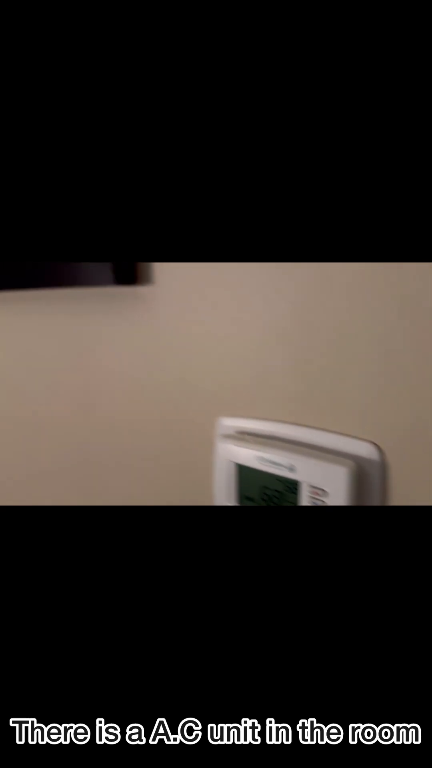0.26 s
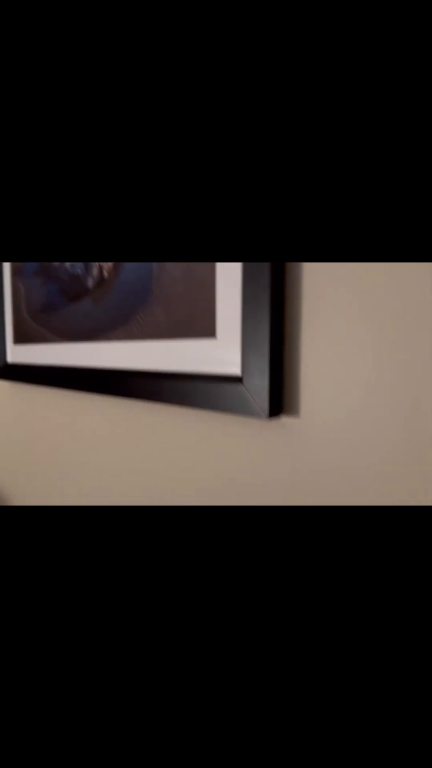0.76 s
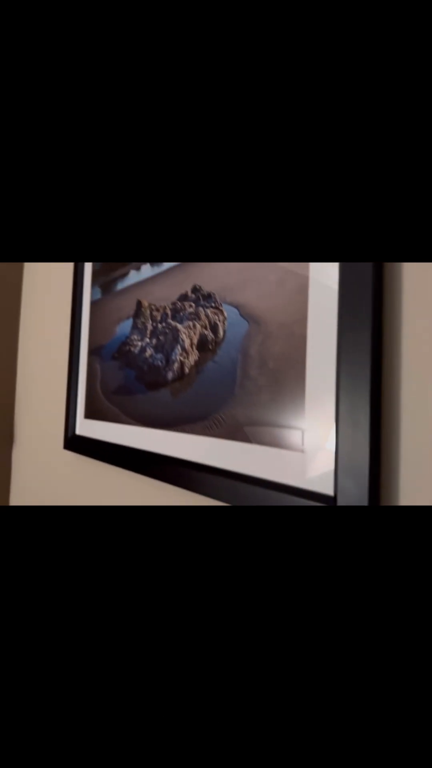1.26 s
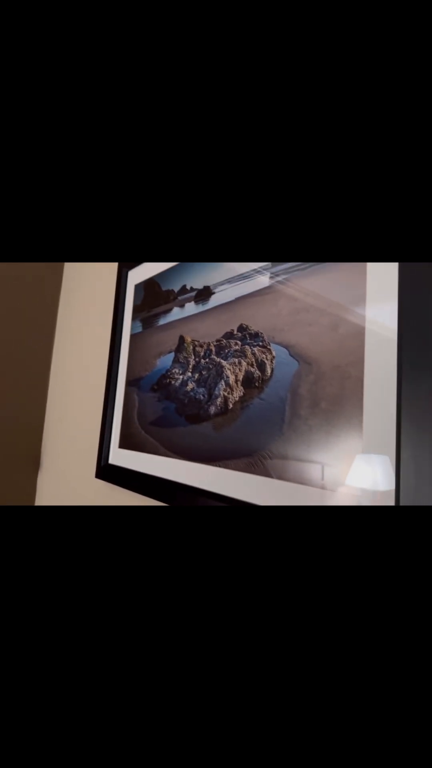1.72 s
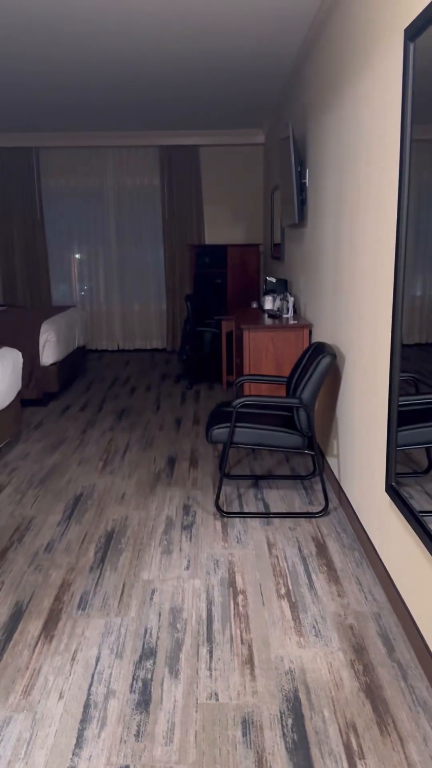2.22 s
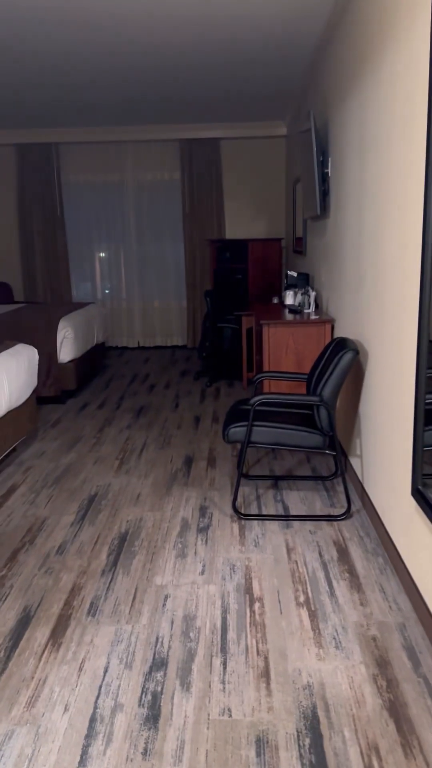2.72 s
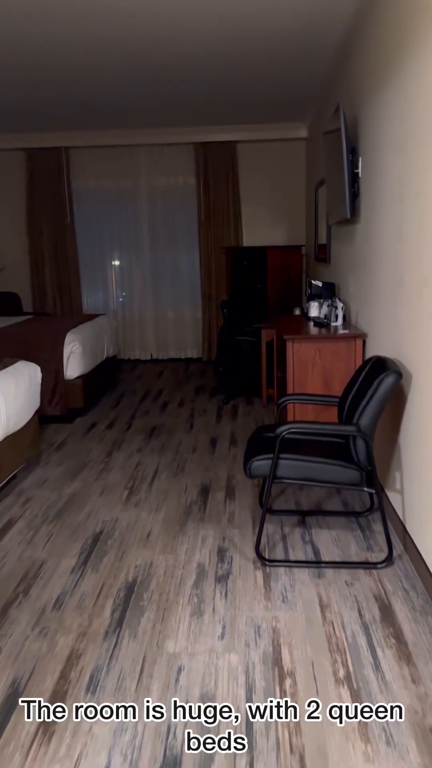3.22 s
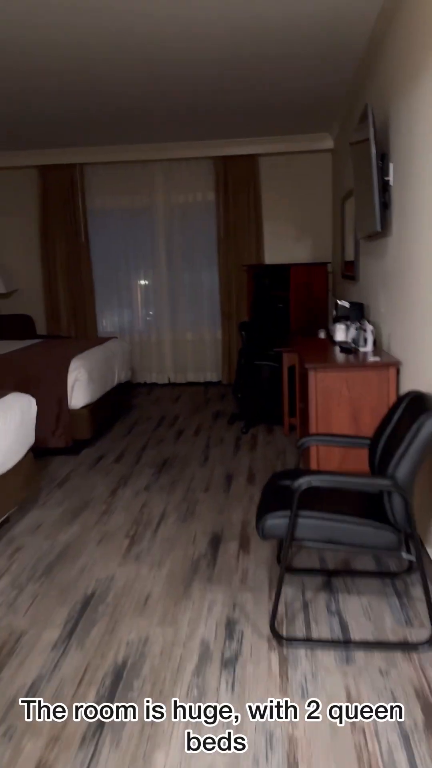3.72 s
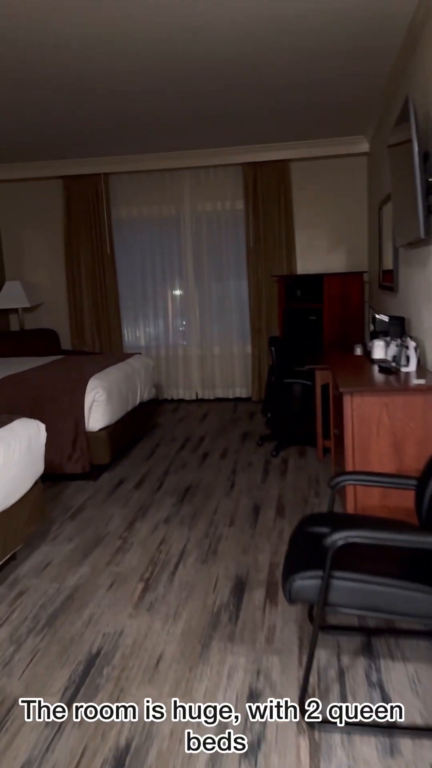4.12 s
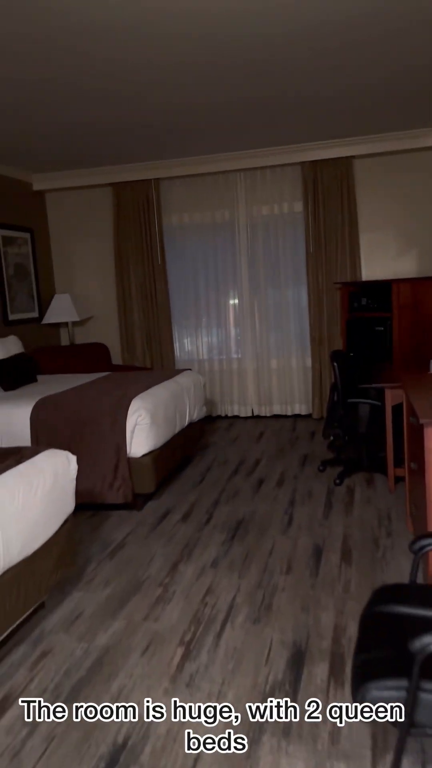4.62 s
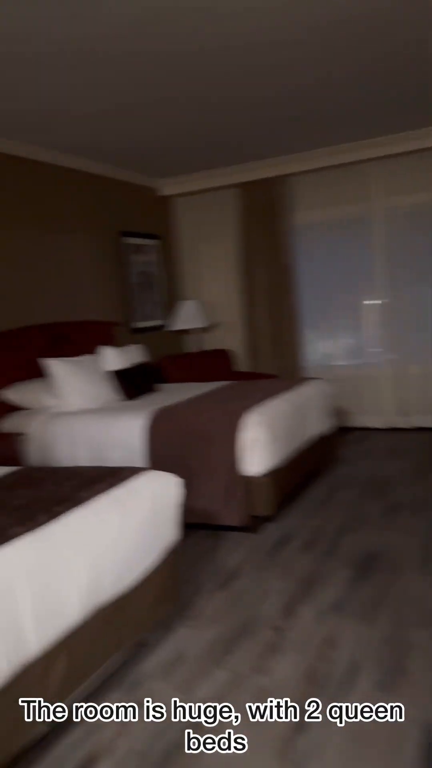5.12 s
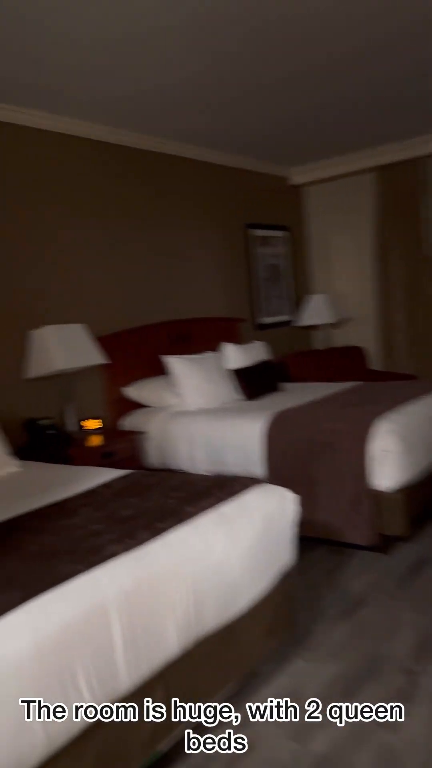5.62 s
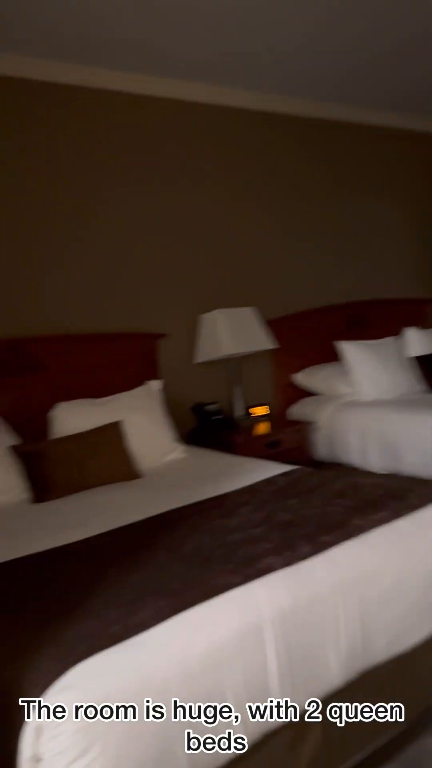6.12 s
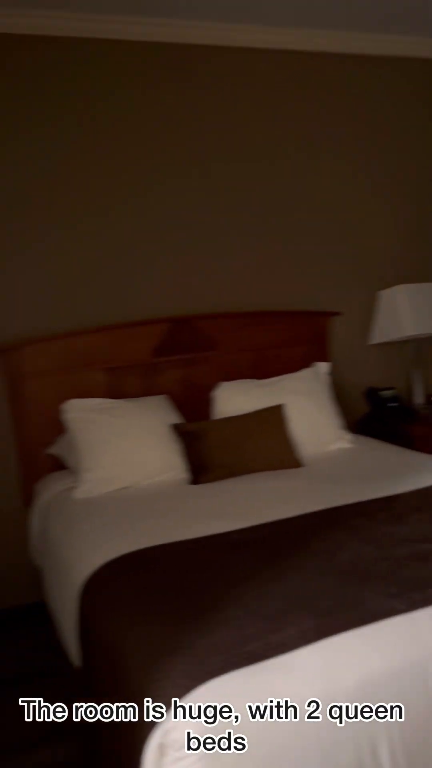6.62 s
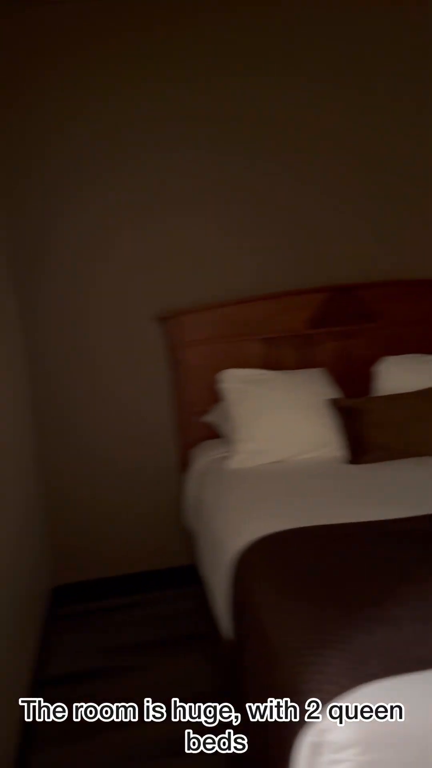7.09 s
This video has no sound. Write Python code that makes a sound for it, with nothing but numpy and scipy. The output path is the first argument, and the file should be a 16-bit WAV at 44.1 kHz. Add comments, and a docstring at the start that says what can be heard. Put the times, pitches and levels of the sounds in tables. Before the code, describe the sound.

A very low, steady air-conditioner drone dominates a furnished bedroom, with a fast gentle throb and soft airy rush. At the start, a knock, cloth rustle and ticks come close by; dull bumps follow near two seconds, a tiny sharp snap near four, and taps, squeaks and a thump around seven. Handheld stereo phone, carried slowly through the room.

```python
"""An air conditioner's compressor drones in a furnished bedroom, as steady rotor and mains tones that beat into a throb.
Its fan adds weak tones at multiples of a third of the rotor speed, with one low hum beside them; shaped noise makes
the air rush and duct resonances. A handheld phone with two microphones is carried through the room's standing waves,
so levels drawn over time rise and sink. Close by, noise strokes make clothes rustle, bursts with decaying tails make
ticks, knocks and squeaks, low modes make bumps, and a falling sweep snaps on the phone's shell."""
import sys
import numpy as np
from scipy import signal
from scipy.fft import rfft, irfft, next_fast_len
from scipy.io import wavfile
from scipy.ndimage import uniform_filter1d, map_coordinates

SR = 44100
rng = np.random.default_rng(int(sys.argv[2]) if len(sys.argv) > 2 else 0)


def put_to_file(sound):
    """Save the sound as 16-bit audio at rate SR, in the file named by the first command-line argument."""
    columns = np.atleast_2d(sound).T  # one column per channel
    safe = np.clip(columns, -1, 1)
    whole_steps = np.round(safe * 32767)
    wavfile.write(sys.argv[1], SR, whole_steps.astype(np.int16))


N = 324249
T = np.arange(N) / SR
ROTOR_HZ, MAINS_HZ = 57.05, 59.975


def amp(db):
    """Gain of a level in dB."""
    return 10 ** (np.asarray(db) / 20)


def unit(x):
    """Scaled to rms 1."""
    return x / np.sqrt(np.mean(x ** 2) + 1e-20)


def along(points, hz):
    """Value at hz between (frequency [Hz], value) points on a log axis."""
    f, v = np.transpose(points)
    return np.interp(np.log(hz + 1), np.log(f + 1), v)


def curves(rows):
    """One value per sample for each column after the time."""
    s, *columns = np.transpose(rows)
    return [np.interp(T, s, column) for column in columns]


def wobble(rate):
    """A smooth random curve with rate knots a second."""
    coarse = T[::128]
    knots = rng.standard_normal(int(N * rate / SR) + 4)
    return np.interp(T, coarse, map_coordinates(knots, [coarse * rate]))


def filtered(x, response):
    """x shaped by a response of frequency."""
    n = x.shape[-1]
    m = next_fast_len(n + 8192)
    return irfft(rfft(x, m) * response(np.fft.rfftfreq(m, 1 / SR)), m)[..., :n]


def coloured(points):
    """White noise shaped by (frequency [Hz], level [dB]) points, rms 1."""
    return unit(filtered(rng.standard_normal(N), lambda f: amp(along(points, f))))


def resonance(centre_hz, width_hz):
    """Response of one damped mode."""
    return lambda f: 1j * f * width_hz / (centre_hz ** 2 - f * f + 1j * f * width_hz)


def tone(hz, db, start_s=None):
    """A tone of rms level db, steady or a curve, cresting at start_s or at a random moment."""
    s = rng.uniform() if start_s is None else start_s
    return np.sqrt(2) * amp(db) * np.cos(2 * np.pi * hz * (T - s))


# How much of the microphones' difference is sound reaching the left one first:
# (frequency [Hz], signed share [-1 to 1])
LEFT_FIRST = [(450, 0.067), (1000, 0.57), (3000, 0.21), (4700, 0.7), (5600, -0.9), (10000, -0.79)]


def noise(mid_points, side_points, patchy_db, ripple_db):
    """Sum and difference noise, each rms 1, with patches of gain and the slow narrow ripple of room resonances."""
    x = rng.standard_normal((2, N))
    # gain depth, window [samples], smoothing over bins and over frames
    for depth_db, window, bins, frames in [(patchy_db, 512, 6, 10), (ripple_db, 4096, 2, 8)]:
        z = signal.stft(x, nperseg=window)[2]
        field = rng.standard_normal(z.shape[1:])
        field = uniform_filter1d(uniform_filter1d(field, bins, 0), frames, 1)
        x = signal.istft(z * amp(depth_db * unit(field)), nperseg=window)[1][:, :N]

    def apart(f):
        # a time lag between the microphones puts the difference a quarter cycle from the sum
        lead = np.clip(along(LEFT_FIRST, f), -1, 1)
        return amp(along(side_points, f)) * np.array([1j * lead, np.sqrt(1 - lead ** 2)])

    mid = filtered(x[0], lambda f: amp(along(mid_points, f)))
    side = filtered(x, apart).sum(axis=0)
    return np.array([unit(mid), unit(side)])


# Air rush in the room, before scaling to rms 1: (frequency [Hz], relative level [dB per Hz])
RUSH_ALIKE = [(170, -33.5), (290, -5), (575, -8), (620, -8), (740, -8), (1030, -22), (1400, -19.5),
              (1750, -27.5), (2400, -19), (2950, -32), (3700, -36), (4450, -30), (5000, -41),
              (10200, -46.5), (10500, -71.5)]  # heard alike at both microphones
RUSH_OPPOSITE = [(76, -31), (130, -7.5), (179, -15), (257, -10.5), (340, -15.5), (584, -6.5), (1250, -22.5),
                 (1800, -39), (2450, -26), (3600, -41.5), (4800, -32), (6000, -50.5), (7500, -41),
                 (15000, -46.5), (15700, -57)]  # heard in opposite phase
RUSH_DB, RUSH_WIDE_DB = -63, -67.5  # usual levels, alike and in opposite phase


def rush():
    """Broad turbulent noise through the grille, its level straying slightly."""
    gain = amp(0.17 * wobble(6.2) + [[RUSH_DB], [RUSH_WIDE_DB]])
    return gain * noise(RUSH_ALIKE, RUSH_OPPOSITE, patchy_db=1.33, ripple_db=2.5)


# Low air noise before scaling to rms 1: (frequency [Hz], relative level [dB per Hz])
RUMBLE_SPECTRUM = [(15, -27.5), (30, -5.5), (70, 0), (100, -6.5), (140, -10.5), (165, -3.5), (185, -16),
                   (215, -8.5), (243, -11.5), (280, -10.5), (305, -19), (330, -69.5)]
# Levels where the phone is, also used by the ducts and the whine: (time [s], duct resonance [dB],
# lower resonance [dB], rumble [dB], rumble's upper part over it [dB], whine sidebands [dB])
PHONE_PLACE = [(0.35, -62, -74, -57, -0.5, -97.5), (1.3, -60, -72, -52.5, -1, -95.5),
               (1.9, -61, -65.5, -49, -4, -95), (2.4, -58.5, -71, -47, -2, -94),
               (2.7, -57, -73, -55, 0, -103.5), (3.2, -57, -65, -55, 1, -103.5),
               (3.9, -52.5, -58.5, -55, 2, -103.5), (4.45, -56.5, -64, -53.5, 1, -103),
               (5.0, -57.5, -60, -53.5, -0.5, -103), (5.95, -61.5, -74.5, -57.5, 2, -96.5),
               (6.6, -61.5, -73, -52.5, -0.5, -95.5), (7.3, -60, -71, -54.5, 0, -102)]


def rumble():
    """Low shaped noise whose part above about 185 Hz rises and sinks separately."""
    _, _, rumble_db, upper_db, _ = curves(PHONE_PLACE)
    body = coloured(RUMBLE_SPECTRUM)
    upper = filtered(body, lambda f: 1 / (1 + (185 / (f + 1)) ** 8))
    body = body + (amp(upper_db) - 1) * upper
    return amp(rumble_db + 1.2 * wobble(2.8)) * body


DUCT, LOW_DUCT = (261, 11), (211.5, 7)  # (centre [Hz], width of each of two cascaded modes [Hz])
WAVER_HZ, WHISTLE_DB = 4, 4.5  # typical pitch straying; usual whistle level over the breathy part
DUCT_WIDE_DB = -17  # opposite-phase part of both resonances


def breath(mode):
    """Noise through the same damped mode twice, rms 1."""
    return unit(filtered(rng.standard_normal(N), lambda f: resonance(*mode)(f) ** 2))


def ducts():
    """Air excites two breathy resonances; the higher one also whistles with a wavering pitch."""
    duct_db, low_db, *_ = curves(PHONE_PLACE)
    whistle = np.cos(2 * np.pi * np.cumsum(DUCT[0] + WAVER_HZ * wobble(5)) / SR)
    duct = unit(breath(DUCT) + amp(WHISTLE_DB + 1.9 * wobble(4.4)) * unit(whistle))
    low, low_apart = breath(LOW_DUCT), breath(LOW_DUCT)
    mid = amp(duct_db) * duct + amp(low_db) * low
    quarter_cycle = filtered(duct, lambda f: 1j + 0 * f)
    side = amp(duct_db) * quarter_cycle + amp(low_db) * low_apart
    return np.array([mid, amp(DUCT_WIDE_DB) * side])


CARRIER_HZ = 9600


def whine():
    """A high carrier, chopped by the rotor: only its two sidebands sound."""
    db = curves(PHONE_PLACE)[4]
    return tone(CARRIER_HZ - ROTOR_HZ, db) + tone(CARRIER_HZ + ROTOR_HZ, db)


# Cloth noise, alike and in opposite phase, before scaling to rms 1:
# (frequency [Hz], relative level [dB per Hz])
CLOTH_ALIKE = [(410, -31.5), (800, -13.5), (1250, -4), (1700, -10.5), (2200, -8), (2700, -13.5),
               (3200, -17.5), (3900, -15.5), (4900, -24.5), (6600, -21), (10200, -35), (10500, -55.5),
               (13600, -54), (14400, -40.5)]
CLOTH_OPPOSITE = [(410, -28), (1020, -10.5), (1630, -31.5), (2530, -15.5), (3600, -21.5), (4800, -22),
                  (6000, -29.5), (9880, -22.5), (15600, -29)]
# Clothes rubbing close by, one row a stroke: (loudest time [s], rise [s], fall [s],
# nominal middle-band peak [dB], treble lift [dB], low lift [dB])
CLOTH_STROKES = [(0.01, .1, 0.14, -62, 8, 6.5), (0.2, 0.06, .12, -60, 0.5, -6),
                 (0.44, 0.18, 0.1, -68, 3, -0.5), (1.58, 0.19, 0.11, -66.5, -8, -2),
                 (1.8, 0.17, 0.2, -66, -0.5, -2), (2.048, .15, .2, -75, 6, 0),
                 (2.35, 0.25, .3, -69.5, 2, -2), (2.69, .3, 0.16, -66, -4.5, -8.5),
                 (4.081, 0.26, 0.19, -69, -3, -2.5), (6.051, 0.24, 0.28, -82.5, 6.5, 0),
                 (7.101, 0.083, .1, -76.5, 1, -1), (7.35, 0.12, .1, -73.5, 4.5, 6)]
STROKE_EDGE_DB = 10.5  # how far a stroke is down a rise before and a fall after its peak
CLOTH_WIDE_DB = -6.5  # opposite-phase part


def rustle():
    """Cloth slides over cloth in strokes that swell and fade, each with its own balance of low, middle and treble."""
    gain = amp(0.86 * wobble(25) + [[0], [CLOTH_WIDE_DB]])
    cloth = gain * noise(CLOTH_ALIKE, CLOTH_OPPOSITE, patchy_db=2.0, ripple_db=3.0)
    low, dull = (filtered(cloth, lambda f: 1 / (1 + (f / edge_hz) ** 4)) for edge_hz in (1650, 4200))
    power = np.zeros((3, N))
    for s, rise, fall, db, bright_db, low_db in CLOTH_STROKES:
        stroke_db = db - STROKE_EDGE_DB * ((T - s) / np.where(T < s, rise, fall)) ** 2
        power += amp(stroke_db) ** 2 * amp([[low_db], [0], [bright_db]]) ** 2
    bands = [low, dull - low, cloth - dull]
    return (np.sqrt(power)[:, None] * bands).sum(axis=0)


# Opposite-phase part of ticks, knocks and squeaks: (frequency [Hz], level [dB])
TOUCH_OPPOSITE = [(400, -8.5), (2000, -7.5), (4500, -4.5), (9000, 2), (13000, 8)]
TOUCH_ALIKE = [(10000, 0.5), (10500, -15.0), (13500, -13), (14500, -2.5)]  # (frequency [Hz], level [dB])
CRACK_S = 0.00065  # a crack is one impulse with the energy of this much tail, at 0 dB


def bursts(rows):
    """Each burst is an optional crack and a decaying noise tail, ringing in one band at both microphones."""
    out, t = np.zeros((2, N + SR)), T[:SR // 2]
    for s, db, centre_hz, width_hz, t60, crack_db, rise, hold in rows:
        shape = amp(-60 * np.maximum(t - hold, 0) / t60) * (1 - np.exp(-t / rise))
        near, far = shape * rng.standard_normal((2, len(t)))
        near[0], far[0] = amp(crack_db) * np.sqrt(CRACK_S * SR) * rng.choice([-1, 1], size=2)
        apart = 0.67 * far + filtered(near, lambda f: 1j * along(LEFT_FIRST, f))

        def response(f):
            # narrow bands are raised to offset the noise they reject
            band = resonance(centre_hz, width_hz)(f) ** 2 * np.sqrt(SR / width_hz)
            return band * amp([along(TOUCH_ALIKE, f), along(TOUCH_OPPOSITE, f)])

        out[:, round(s * SR):][:, :len(t)] += amp(db) * filtered(np.array([near, apart]), response)
    return out[:, :N]


STRIKE_RISE_S = 0.0012  # time constant of the tail's onset in ticks and knocks

# Small ticks and taps of floor and grip, a row for each band that rings: (time [s], nominal level [dB],
# centre [Hz], mode width [Hz], t60 [s], crack over the tail [dB])
TICK_BANDS = [(0.1582, -62, 6170, 5000, .4, 4.5), (0.176, -61, 3700, 1180, 0.22, -4.5),
              (0.2, -60.5, 700, 498, 0.38, -3), (0.331, -69, 3800, 1300, .35, 9.5),
              (0.334, -75.5, 6600, 2000, .25, 3), (0.42, -73, 6400, 2994, 0.31, 3),
              (0.333, -72, 1900, 1200, .3, 0), (0.42, -71, 1900, 1200, .35, 1),
              (0.4188, -67, 3800, 1200, 0.25, 8), (1.108, -79, 9060, 4040, .3, 3),
              (1.4558, -76.5, 4420, 2200, 0.24, 13), (1.4902, -71, 7870, 993, 0.36, 2),
              (1.4922, -78, 13400, 2970, .26, 2), (1.524, -76.5, 4030, 798, .12, 16.5),
              (1.523, -68.5, 2220, 896, 0.16, 2), (1.523, -77.5, 6470, 2990, .2, 11.5),
              (1.7531, -76.5, 4300, 1500, .3, 13.5), (1.7536, -83, 6500, 1500, .3, 15),
              (2.07, -79, 3450, 500, 0.11, 6), (2.959, -84, 4440, 1460, 0.66, 6),
              (3.05, -78, 4460, 1200, .4, 2.5), (4.1477, -75, 2300, 900, .05, 18.5),
              (4.1494, -87, 3550, 500, .05, 18.5), (4.1482, -83.5, 5300, 1500, .05, 21.5),
              (4.1477, -92.5, 8040, 2500, 0.046, 23.5), (5.2035, -81.5, 4350, 2190, 0.43, 9.5),
              (5.342, -83.5, 6480, 6060, 0.26, 7.5), (5.2035, -88.5, 6770, 1486, 0.3, -3),
              (5.681, -74, 4380, 904, 0.44, 6.5), (5.68, -77.5, 6770, 605, 0.41, 4),
              (5.686, -72.5, 3710, 800, 0.44, -4), (5.683, -79, 7020, 4970, 0.36, 1),
              (5.695, -73.5, 1653, 400, 0.36, 1), (5.685, -75, 2425, 500, 0.35, -2),
              (5.685, -78.5, 5490, 500, 0.29, 0), (6.072, -79.5, 5530, 2510, 0.38, 2),
              (6.856, -78, 4190, 3010, 0.26, 1), (6.909, -83, 5700, 696, 0.3, -4.5),
              (6.926, -68.5, 598, 399, 0.16, 8), (7.0577, -76, 4000, 1490, 0.77, 4),
              (7.0576, -72.5, 2520, 600, 0.29, 5.5), (7.076, -62.5, 558, 398, 0.29, -4.5),
              (7.13, -60.5, 706, 500, 0.39, -2), (7.162, -65, 1050, 401, 0.11, -8),
              (7.163, -71.5, 1450, 402, 0.13, -4), (7.181, -68.5, 625, 300, 0.15, -5),
              (7.255, -79.5, 6600, 4860, .45, 3.5), (7.266, -76, 2800, 2500, .2, 8.5)]


def ticks():
    """A short crack excites its own band and leaves a scattered tail."""
    return bursts([(*row, STRIKE_RISE_S, 0) for row in TICK_BANDS])


# Soft knocks of the hand on what it carries:
# (time [s], nominal level [dB], brightness [dB per octave], t60 [s])
HAND_KNOCKS = [(0, -54.5, -2.5, 0.35), (0.16, -55, -1, 0.37)]
# What a knock sounds in: (centre [Hz], mode width [Hz], relative level [dB])
KNOCK_MODES = [(226.6, 69, 4), (355, 130, -2.5), (600, 480, -4), (1230, 580, -2.5), (2500, 880, -7.5)]
KNOCK_CRACK_DB = 3  # crack over the tail


def knocks():
    """A knock excites several low bands at once, tilted about 650 Hz."""
    rows = []
    for s, db, tilt_db, t60 in HAND_KNOCKS:
        for hz, width, level in KNOCK_MODES:
            band_db = db + level + tilt_db * np.log2(hz / 650)
            rows.append((s, band_db, hz, width, t60, KNOCK_CRACK_DB, STRIKE_RISE_S, 0))
    return bursts(rows)


# Short squeaks and scrapes: (time [s], nominal level [dB], centre [Hz], mode width [Hz],
# rise time constant [s], hold [s], t60 [s])
SCRAPES = [(0.003, -63, 1320, 450, .004, .04, .4), (0.003, -73, 5600, 3500, 0.0043, .05, 0.31),
           (1.901, -87, 8400, 3000, .08, .3, .6), (2.2, -89, 8000, 3000, .06, .15, 0.55),
           (2.28, -76, 2320, 400, .03, 0.19, .2), (2.5, -77, 2220, 350, 0.065, .23, 0.19),
           (2.66, -81, 3600, 598, 0.035, 0.054, .2), (4.001, -80.5, 2250, 500, .02, .13, 0.089),
           (4.149, -76, 5750, 5030, .003, 0.044, 0.29), (6.856, -73, 5700, 449, .002, 0.033, .12),
           (6.857, -75, 2980, 250, .002, 0.016, .08), (6.988, -72, 2270, 349, .003, 0.018, 0.071),
           (7.08, -65, 1320, 200, .003, .018, .12), (7.083, -70.5, 2410, 500, .005, 0.023, .15)]


def squeaks():
    """Rubbing noise in one band builds up without a crack, holds, then dies."""
    return bursts([(s, db, hz, width, t60, -np.inf, rise, hold)
                   for s, db, hz, width, rise, hold, t60 in SCRAPES])


# Dull bumps: (time [s], nominal level [dB], t60 [s])
DULL_BUMPS = [(-.009, -37, 1.5), (1.877, -39.5, 0.21), (1.9637, -28, .2), (7.0669, -31, 0.15)]
# What the room's floor rings with: (frequency [Hz], relative peak [dB])
FLOOR_MODES = [(37, -4.5), (48, -8.5), (67, 6)]


def bumps():
    """Soft blows make low floor modes ring and die away."""
    out = np.zeros(N)
    for s, db, t60 in DULL_BUMPS:
        t = np.maximum(T - s, 0)
        ring = sum(amp(level) * np.sin(2 * np.pi * hz * t) for hz, level in FLOOR_MODES)
        out += amp(db - 60 * t / t60) * (1 - np.exp(-t / 0.016)) * ring
    return out


# A finger snaps on the phone's shell: (time [s], envelope peak [dB])
SHELL_SNAPS = [(4.1478, -42.5)]
SNAP_CYCLE_S, SNAP_PEAK_S = .00041, .0015  # length of the first cycle; time of the envelope peak


def snaps():
    """The shell bends opposite ways at the two microphones; treble arrives first, so the pitch falls."""
    out = np.zeros(N)
    for s, db in SHELL_SNAPS:
        t = np.maximum(T - s, 0)
        envelope = t / SNAP_PEAK_S * np.exp(1 - t / SNAP_PEAK_S)
        out -= amp(db) * envelope * np.sin(2 * np.pi * np.sqrt(t / SNAP_CYCLE_S))
    return out


# The stronger fan orders: [multiple of a third of the rotor speed]
ORDERS = [8, 12, 19, 22, 30, 9, 11, 15, 16, 23, 24, 26, 31, 34, 35, 37, 40]
# Usual level of each of them: [dB]
ORDER_LEVELS = [-66.5, -65, -76.5, -77.5, -76.5, -70.5, -77, -79, -81.5, -84.5, -84, -86, -82, -86, -84.5,
                -86.5, -85]
# An order swells while the phone passes one of its crests, a list for each order:
# (time [s], lift [dB], half length [s])
ORDER_SWELLS = [
    [(0.1, 10.5, 0.28), (1.5, 15.5, 0.55), (2.76, 11.5, 0.26), (3.45, 8.5, 0.29), (4.2, 1.5, .6),
     (6.5, 3, 0.57)],
    [(1.95, 7.5, 0.38), (5.3, 4, 0.94), (6.55, 2, 0.39)],
    [(0.1, 12.5, .2), (1.1, 2.5, .3), (3.4, 6.5, 0.69), (5.3, 12.5, 0.91), (7.05, 2, .3)],
    [(2.9, 5, 0.35), (5.5, 9.5, 0.7), (7.2, 6.5, 0.36)],
    [(0.1, 7, 0.53), (1.15, 13.5, 0.43), (3.0, 9.5, 0.36), (4.08, 7, 0.15), (5.75, 10.5, 0.27),
     (6.25, 9.5, 0.44)],
    [(0.3, 2.5, .4), (1.85, 10.5, .8), (3.2, 3.5, .8)],
    [(2.4, 9.5, .6), (3.7, 15.5, .5), (4.8, 14, .35)],
    [(1.5, 10.5, .5), (3.2, 12.5, 1.2), (5.2, 9, .8)],
    [(0.2, 14, .4), (2.05, 11.5, .35)],
    [(3.7, 11.5, .7), (4.7, 7.5, .3), (7.0, 8.5, .3)],
    [(0.9, 10.5, 0.55), (5.2, 6, .7), (6.3, 9.5, .5)],
    [(1.55, 14.5, .4), (3.75, 14, .45)],
    [(0.6, 11.5, .7), (2.1, 7.5, .3), (3.1, 5.5, .4), (6.0, 7, .6)],
    [(1.2, 6, .6), (2.5, 12.5, .3), (6.1, 8.5, .4)],
    [(4.2, 12, .7), (6.6, 4, .3)],
    [(0.7, 7, 0.27), (1.6, 8.5, .3), (5.8, 12.5, .6)],
    [(0.5, 10, .4), (2.5, 13, .35), (3.7, 7, .5), (5.5, 8.5, .5)],
]
# A low hum beside the orders that hardly changes: (frequency [Hz], usual level [dB])
LOW_HUM = [(103.9, -58.5)]
# Usual level of the remaining orders: (frequency [Hz], level [dB])
FAINT_ORDERS = [(240, -78), (450, -85), (800, -93.5), (1200, -93.5)]


def fan_and_hum_tones():
    """Weak unsteady tones: orders of the fan shaft, and one low hum beside them; the microphones differ."""
    shaft_hz = ROTOR_HZ / 3
    tones = list(LOW_HUM)
    for order, db, swells in zip(ORDERS, ORDER_LEVELS, ORDER_SWELLS):
        lift = sum(lift_db * np.exp(-((T - s) / half) ** 2) for s, lift_db, half in swells)
        tones.append((order * shaft_hz, db + lift))
    for order in range(10, 62):
        if order not in ORDERS:
            # the faint orders swell and vanish by chance as the phone moves
            hz = order * shaft_hz
            tones.append((hz, along(FAINT_ORDERS, hz) + 4.9 * wobble(1.5)))
    mid, side = np.zeros((2, N))
    for hz, db in tones:
        # towards 600 Hz the two microphones differ more
        side_db = along([(100, -23.5), (600, -9.5)], hz)
        mid += tone(hz, db + 1.6 * wobble(8.6))
        side += tone(hz, db + side_db + 2.0 * wobble(1.8))
    return np.array([mid, side])


# The drone where the phone is held: (time [s], level [dB])
DRONE_LEVEL = [(0.3, -20), (0.75, -20), (1.66, -20.5), (2.21, -21.5), (2.56, -24), (3.14, -24.5),
               (5.64, -22.5), (6.28, -20), (6.7, -20), (7.3, -21.5)]
# Standing waves lift and sink the two beating tones: (time [s], double speed [dB], mains buzz [dB])
THROB_LEVELS = [(0.15, -42, -44.5), (1.4, -42, -42.5), (2.1, -43, -41), (2.45, -52, -45), (3.4, -56.5, -48),
                (3.8, -69.5, -48), (4.7, -71.5, -50.5), (5.4, -65.5, -48), (6.4, -54.5, -51),
                (6.8, -59, -50.5), (7.25, -52, -44)]
CREST_S, SWELL_S = .0125, .035  # a pressure crest of the drone; a moment when the throbbing tones are in step


def compressor():
    """The rotor slips behind the mains, so its double and the mains buzz beat about six times a second."""
    double_db, buzz_db = curves(THROB_LEVELS)
    drone = tone(ROTOR_HZ, curves(DRONE_LEVEL)[0] + 0.091 * wobble(22), CREST_S)
    double_crest = CREST_S + 1 / (8 * ROTOR_HZ)  # a quarter of the double's cycle after the drone's crest
    buzz_crest = SWELL_S + (double_crest - SWELL_S) * ROTOR_HZ / MAINS_HZ  # in step at the swell
    double = tone(2 * ROTOR_HZ, double_db, double_crest)
    buzz = tone(2 * MAINS_HZ, buzz_db, buzz_crest)
    return drone + double + buzz


def scene():
    """Sum and difference signals become left and right."""
    mid, side = rush() + ducts() + rustle() + ticks() + knocks() + squeaks() + fan_and_hum_tones()
    mid = mid + rumble() + whine() + bumps() + compressor()
    side = side + snaps()
    return np.array([mid + side, mid - side])


# Balance of the two microphones: (frequency [Hz], left minus right [dB])
BALANCE = [(60, -.45), (130, -.8), (250, -2), (420, -3.5), (700, -3.5), (1290, -.4), (4400, -.4), (9000, 0)]
TOP_HZ = 15750  # band limit, before the hiss


def record(dry):
    """The two channels lean a little and are band-limited; a trace of converter hiss is added."""
    lean = np.array([[.5], [-.5]])
    kept = filtered(dry, lambda hz: amp(along(BALANCE, hz) * lean) * (hz < TOP_HZ))
    return kept + amp(-103) * rng.standard_normal(dry.shape)


dry = scene()
out = record(dry)
put_to_file(out)
```